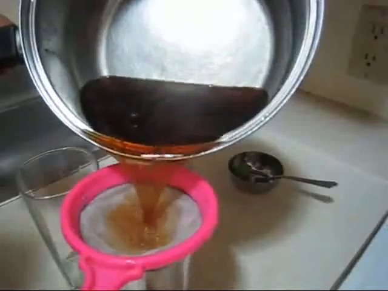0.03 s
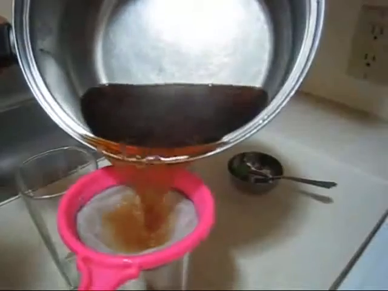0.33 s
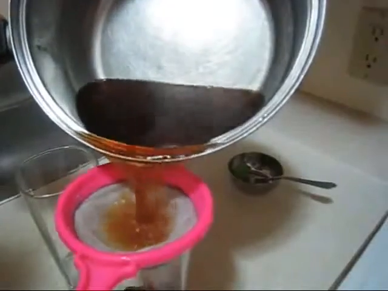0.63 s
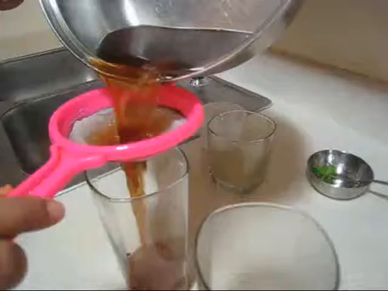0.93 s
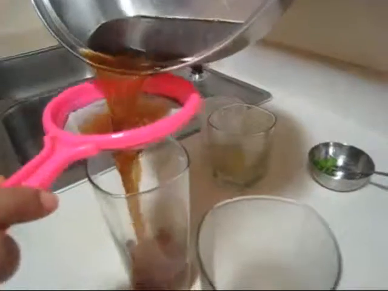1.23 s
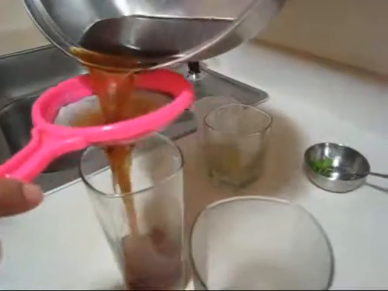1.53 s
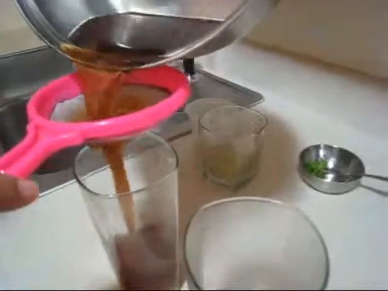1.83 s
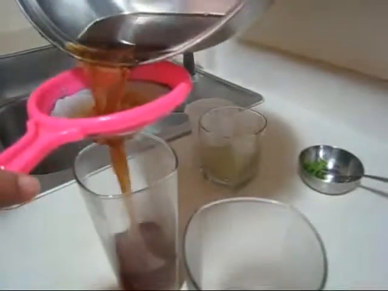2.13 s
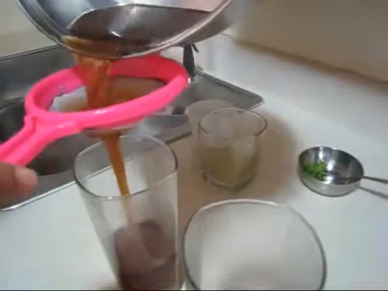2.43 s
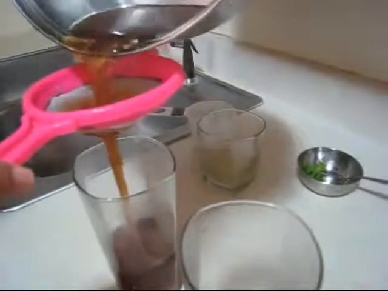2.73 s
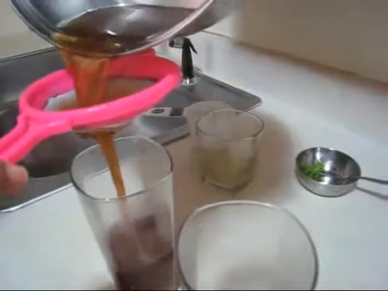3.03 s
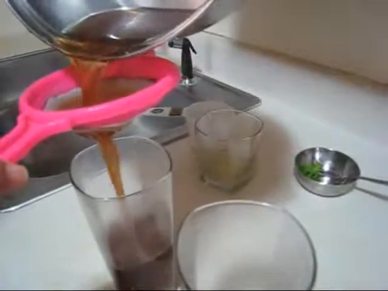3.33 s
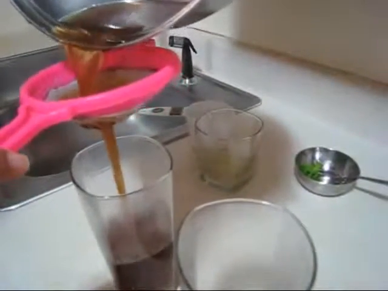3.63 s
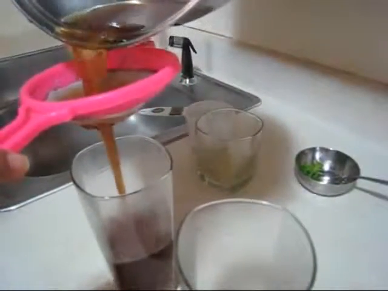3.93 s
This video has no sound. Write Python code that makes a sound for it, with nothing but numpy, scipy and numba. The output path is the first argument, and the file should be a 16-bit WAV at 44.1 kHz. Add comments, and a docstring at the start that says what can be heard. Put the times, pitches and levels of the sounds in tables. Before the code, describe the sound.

Tea trickles through a strainer into a glass close by, over a steady low kitchen appliance hum. The pan gives a sharp tap at about 0.8 seconds, and the sound briefly drops out. From 1 second the pour returns with more gurgling and fizz, with a soft bump near 1.2 and a strainer clink at 1.5. Pattering and small plinks continue until 4 seconds, the pitch gradually rising.

```python
"""Tea patters from a pan through a strainer into a tall glass, over the hum of a kitchen appliance.
The impacts of the stream excite the air column in the glass, whose resonance rises as it fills.
Trapped bubbles oscillate as gulps, plinks and fizz; the utensils clink, knock and bump.
The sound drops out briefly near one second, and images of its spectrum brighten the treble."""
import sys
import numpy as np
from scipy import signal
from scipy.fft import rfft, irfft
from scipy.io import wavfile
from scipy.ndimage import uniform_filter1d
from numba import njit

SR = 44100
rng = np.random.default_rng(int(sys.argv[2]) if len(sys.argv) > 2 else 0)


def inscribe(sig):
    """Save sig as 16-bit PCM at rate SR to the path in sys.argv[1].

    A 1-D sig is mono; a 2-D sig holds one channel per row.
    Samples are clipped to [-1, 1] before scaling.
    """
    pcm = np.round(np.clip(np.atleast_2d(sig).T, -1, 1) * 32767)
    wavfile.write(sys.argv[1], SR, pcm.astype(np.int16))


N = 176400
T = np.arange(N) / SR

# partials of the appliance motor (f/Hz, rms level/dB)
HUM_PARTIALS = [(59, -47), (90, -58), (212, -51.5), (231, -39.5), (303, -52.5), (353, -51), (462, -53.5)]
# room noise spectrum (f/Hz, relative level/dB)
ROOM_SPECTRUM = [(10, -37), (22, 2), (40, -11), (58, -5.5), (100, 4), (135, -7.5), (215, 4), (270, -8),
                 (400, -10.5), (700, -17), (1200, -19), (2500, -26.5), (5500, -32.5)]
# course of the pour (t/s, air column f/Hz, air column level/dB, patter level/dB)
POUR_COURSE = [(0, 649, -44, -47.5), (.36, 654, -46, -47), (.45, 694, -53, -54.5), (.9, 710, -61, -52),
               (1.05, 664, -38.5, -42.5), (1.4, 686, -40.5, -46), (1.58, 739, -46.5, -47),
               (1.8, 764, -44, -43), (2.1, 766, -37, -45.5), (2.35, 797, -46, -43), (2.5, 817, -37.5, -50),
               (2.6, 782, -47, -48), (3.1, 782, -48, -50), (3.55, 828, -51, -46), (3.75, 936, -39, -48),
               (3.84, 920, -53.5, -50.5), (3.92, 915, -40.5, -44), (4, 902, -44, -48.5)]
# spectrum of the stream's impacts (f/Hz, relative level/dB)
PATTER_SPECTRUM = [(200, -28.5), (450, 2), (900, 5), (1300, -2.5), (2000, -2.5), (3200, -11), (4200, -17),
                   (5500, -11)]
# upper mode of the air column (t/s, f/Hz, level/dB)
AIR_OVERTONE = [(0, 1827, -45.5), (.139, 1945, -48), (.22, 1950, -62), (.35, 1980, -45), (.45, 2040, -66),
                (.7, 2045, -61), (.92, 2080, -68), (1.05, 1776, -48), (1.4, 1780, -55), (1.7, 2020, -57),
                (4, 2150, -90)]
# response of the glass and the counter (f/Hz, gain/dB)
COUNTER_RESPONSE = [(300, 0), (560, -1.5), (612, 3), (652, -3), (690, 1.5), (790, 0), (818, -3), (850, -8),
                    (915, 2), (1000, 0), (1150, 1), (2050, .5), (2350, -3), (2800, 0), (5500, 1)]
# envelope of the froth (t/s, level/dB)
FROTH_LEVEL = [(0, -53), (.12, -63.5), (.2, -79), (.3, -48.5), (.42, -62), (.9, -76.5), (1.05, -45.5),
               (1.35, -44.5), (1.45, -49), (1.65, -50.5), (1.8, -52), (2.3, -56), (2.55, -54.5),
               (3.2, -52.5), (3.5, -60), (4, -53)]
# faint high ringing of the strainer as the tea trickles through it (f/Hz, bandwidth/Hz, level/dB)
STRAINER_RING = [(3140, 70, -71), (3650, 80, -62.5)]
# envelope of the fine spray (t/s, level/dB)
SPRAY_LEVEL = [(0, -61), (1, -68), (1.1, -61), (2.3, -63), (2.7, -59), (3.5, -56), (4, -55.5)]
# small bubbles near the surface (t/s, level/dB, f/Hz)
SMALL_BUBBLES = [(.1026, -26, 3430), (.134, -31, 1980), (0.286, -26, 3580), (.338, -27, 3530),
                 (.699, -28.5, 2070), (1.157, -28, 3260), (1.191, -26, 2870), (1.317, -28, 3305),
                 (1.3317, -24, 3010), (1.3387, -24, 3070), (1.37, -23.5, 2880), (1.383, -23.5, 3160),
                 (1.412, -30, 3360), (1.519, -22, 3260), (1.6295, -23.5, 3100), (2.0315, -26, 3390),
                 (2.299, -23.5, 2530), (2.4255, -21.5, 2880), (2.6734, -24.5, 3660), (2.706, -29.5, 2560),
                 (2.834, -30, 2560), (2.882, -22.5, 2160), (3.105, -27, 3400), (3.189, -28, 4300),
                 (3.282, -26.5, 3900), (3.312, -28, 2570), (3.408, -24.5, 4420), (3.4355, -23.5, 3370),
                 (3.5114, -23.5, 3370), (3.54, -24.5, 4500), (3.599, -26, 2720), (3.6715, -26.5, 3230),
                 (3.833, -30, 2700), (3.862, -28.5, 3540), (3.8918, -23, 3000), (3.9593, -24, 2830)]
# large bubbles (t/s, level/dB, f/Hz, decay time/s)
LARGE_BUBBLES = [(.1205, -22, 864, 0.00273), (.548, -33, 950, 0.0043), (1.051, -21.5, 629, 0.015),
                 (1.068, -16, 710, 0.0046), (1.071, -25.5, 1000, 0.003), (1.089, -22.5, 764, 0.0079),
                 (1.137, -26.5, 678, 0.009), (1.2, -29, 747, 0.0053), (1.28, -22.5, 745, 0.0038),
                 (1.312, -26.5, 690, 0.0081), (1.368, -24, 764, 0.0051), (1.558, -28.5, 905, 0.0058),
                 (1.642, -29.5, 777, 0.0068), (1.769, -29.5, 780, 0.011), (1.823, -20.5, 806, 0.0048),
                 (1.851, -27.5, 775, 0.0044), (1.973, -33.5, 767, 0.0099), (2.03, -29.5, 780, .009),
                 (2.05, -26.5, 753, 0.011), (2.116, -30, 797, 0.014), (2.222, -28, 753, 0.0095),
                 (2.248, -29, 800, .011), (2.274, -26.5, 787, 0.0069), (2.3, -24, 804, 0.0096),
                 (2.447, -26, 782, 0.0084), (2.517, -29.5, 803, 0.013), (2.647, -24.5, 790, 0.01),
                 (2.769, -25, 805, 0.0074), (2.881, -31.5, 780, 0.0069), (3.07, -23, 810, .006),
                 (3.171, -28.5, 900, 0.0037), (3.573, -32.5, 1230, .0038), (3.672, -19, 940, 0.0068),
                 (3.723, -25.5, 915, .0055), (3.772, -35, 925, 0.0075), (3.8727, -18, 880, 0.0048),
                 (3.911, -27.5, 1280, 0.0033), (3.92, -28.5, 896, 0.0085), (3.948, -32, 923, 0.0075)]
# spectrum of a large bubble's splash (f/Hz, relative level/dB)
SPLASH_SPECTRUM = [(300, -20.5), (600, 0.5), (1000, 6), (1700, -3.5), (5500, -16)]
# blows on the pan (t/s, level/dB)
PAN_BLOWS = [(.8195, -22.5), (.8342, -1.5)]
# modes of the pan (f/Hz, relative level/dB, decay time/s)
PAN_MODES = [(3694, -2.5, 0.0011), (3170, -15.5, 0.0011), (1107, -11.5, 0.0005), (1790, -19.5, 0.0014)]
# handling bumps (t/s, level/dB, f/Hz, decay time/s, tick level/dB)
HANDLING_BUMPS = [(1.244, -7.5, 91, 0.0031, -29), (1.303, -16, 108, 0.0044, -41)]
# blows of the strainer on the glass (t/s, level/dB)
STRAINER_BLOWS = [(1.499, -23), (1.5027, -7.5), (1.5045, -6.5), (1.5062, -16)]
# modes of the strainer on the glass (f/Hz, relative level/dB, decay time/s)
STRAINER_MODES = [(960, -8.5, 0.0026), (1480, -6, .0034), (2000, -6, 0.0025), (3120, -9, 0.0024),
                  (3550, -2, 0.00093), (4900, -18, 0.0012)]

ROOM_DB, HUM_WANDER, HUM_FLICKER_DB = -36, 0.00572, 2.5
PATTER_PER_S, PATTER_SPREAD_DB, SURGE_DB = 1500, 3, 2.5
AIR_WIDTH_HZ, OVERTONE_WIDTH_HZ = 49., 160.
FIZZ_PER_S, FIZZ_SPREAD_DB, FIZZ_CYCLES, FIZZ_LOW_HZ, FIZZ_HIGH_HZ = 700, 4, 5.6, 1954, 4730
SPRAY_PER_S, SPRAY_SPREAD_DB, SPRAY_HZ, SPRAY_WIDTH_HZ = 130, 2.6, 4580., 1800.
PLINK_CYCLES, SMALL_RISE_PER_S, PLINK_TICK_DB = 4.2, 6, -14
REFLECTION_S, REFLECTION_DB, GULP_AIR_DB, SPLASH_S, SPLASH_DB = 0.005157, -8, -10, 0.0073, -11.5
TAIL_S, TAIL_DB, TAIL_ABOVE_HZ = 0.015, -6.5, 1500
PAUSE_START_S, PAUSE_END_S, PAUSE_DB, HOLD_SAMPLES = .919, 1.049, -65, 4


def amp(db):
    """Amplitude ratio of a level in decibels."""
    return 10 ** (np.asarray(db) / 20)


def unit(x):
    """Normalisation to rms 1."""
    return x / np.sqrt(np.mean(x ** 2))


def curves(table):
    """Linear interpolation in time of each column after the first."""
    times, *columns = np.array(table).T
    return [np.interp(T, times, column) for column in columns]


def walk(rate):
    """Smoothed random fluctuation with a spread near 1."""
    span = int(SR / rate)
    steps = np.repeat(rng.standard_normal(N // span + 1), span)
    return 1.414 * uniform_filter1d(uniform_filter1d(steps, span), span)[:N]


def colour(x, points):
    """Minimum-phase filter through (f/Hz, gain/dB) points, cut off at half the hold rate."""
    hz, db = np.array(points).T
    f = np.maximum(np.arange(N // 2 + 1) * SR / N, 1)
    gain = amp(np.interp(np.log(f), np.log(hz), db))
    cepstrum = irfft(np.log(gain), N)
    cepstrum[1:N // 2] *= 2
    cepstrum[N // 2 + 1:] = 0
    return irfft(rfft(x) * np.exp(rfft(cepstrum)) * (f < SR / HOLD_SAMPLES / 2), N)


@njit
def resonate(x, hz, width):
    """Second-order resonator with unit gain at its moving centre frequency."""
    y, band, low = np.empty(len(x)), 0., 0.
    for i in range(len(x)):
        g, loss = np.tan(np.pi * hz[i] / SR), width / hz[i]
        v = (band + g * (x[i] - low)) / (1 + g * (g + loss))
        band, low, y[i] = 2 * v - band, low + 2 * g * v, loss * v
    return y


def ping(hz, decay, rise=0, attack=.0001):
    """Damped oscillation whose frequency grows by the fraction `rise` per second."""
    t = T[:int(6 * decay * SR) + 2]
    return np.sin(2 * np.pi * hz * (t + rise * t * t / 2)) * np.exp(-t / decay) * (1 - np.exp(-t / attack))


def burst(decay, length=SR // 4):
    """White noise under exponential decay."""
    return rng.standard_normal(length) * np.exp(-T[:length] / decay)


def add(out, start, sound):
    """Superposition of a sound from time `start` on."""
    i = int(np.clip(start * SR, 0, N - 1))
    out[i:i + len(sound)] += sound[:N - i]


def kitchen():
    """Motor partials under slow random modulation of frequency and amplitude, over room noise."""
    out = amp(ROOM_DB) * unit(colour(rng.standard_normal(N), ROOM_SPECTRUM))
    for hz, db in HUM_PARTIALS:
        turns = np.cumsum(hz * (1 + HUM_WANDER * walk(12))) / SR + rng.random()
        out += np.sqrt(2) * amp(db + HUM_FLICKER_DB * walk(14)) * np.sin(2 * np.pi * turns)
    return out


def stream():
    """Shot noise of dense tiny impacts, heard directly and through two modes of the air column."""
    _, air_db, patter_db = curves(POUR_COURSE)
    sizes = amp(PATTER_SPREAD_DB * np.minimum(rng.exponential(size=N), 5)) * rng.choice([-1, 1], N)
    hits = sizes * (rng.random(N) < PATTER_PER_S / SR) * amp(SURGE_DB * walk(80))
    patter = unit(colour(hits, PATTER_SPECTRUM))
    ring = unit(glass_air(patter)) * amp(air_db)
    overtone_hz, overtone_db = curves(AIR_OVERTONE)
    overtone = resonate(patter, overtone_hz, OVERTONE_WIDTH_HZ)
    overtone = unit(resonate(overtone, overtone_hz, OVERTONE_WIDTH_HZ)) * amp(overtone_db)
    return patter * amp(patter_db) + ring + overtone


def glass_air(x):
    """Air column resonance: the frequency rises as the tea shortens the column."""
    air_hz, _, _ = curves(POUR_COURSE)
    return resonate(x, air_hz, AIR_WIDTH_HZ)


def fizz():
    """Free oscillations of many tiny bubbles, mostly of middling size, sum to a crackling froth."""
    out = np.zeros(N)
    for when, a, b, size, sustain in rng.random((int(FIZZ_PER_S * N / SR), 5)):
        hz = FIZZ_LOW_HZ * (FIZZ_HIGH_HZ / FIZZ_LOW_HZ) ** ((a + b) / 2)
        gain = amp(-FIZZ_SPREAD_DB * np.log(size + 0.013))
        decay = FIZZ_CYCLES * (.5 + sustain) / hz
        add(out, when * N / SR, gain * ping(hz, decay, SMALL_RISE_PER_S))
    return unit(out) * amp(curves(FROTH_LEVEL)[0])


def trickle():
    """Forced vibration: until the pause, tea trickling through the strainer makes it ring faintly."""
    out = np.zeros(N)
    for hz, width, db in STRAINER_RING:
        out += amp(db) * unit(resonate(rng.standard_normal(N), np.full(N, float(hz)), float(width)))
    return out * (T < PAUSE_START_S)


def spray():
    """Sparse droplets strike the glass; each tick is the impulse response of a broad resonance."""
    sizes = amp(SPRAY_SPREAD_DB * np.minimum(rng.exponential(size=N), 4))
    hits = sizes * (rng.random(N) < SPRAY_PER_S / SR)
    ticks = colour(resonate(hits, np.full(N, SPRAY_HZ), SPRAY_WIDTH_HZ), COUNTER_RESPONSE)
    return unit(ticks) * amp(curves(SPRAY_LEVEL)[0])


def plinks():
    """Bubble resonance: small pockets of air near the surface start with a tick and ring high."""
    out = np.zeros(N)
    for start, db, hz in SMALL_BUBBLES:
        add(out, start, amp(db) * ping(hz, PLINK_CYCLES / hz, SMALL_RISE_PER_S, attack=0.0005))
        add(out, start, amp(db + PLINK_TICK_DB) * burst(decay=.003))
    return out


def gulps():
    """Large bubbles resonate low and reflect off the pan; with their splash they drive the air column."""
    tones, splash_envelope = np.zeros(N), np.zeros(N)
    for start, db, hz, decay in LARGE_BUBBLES:
        gulp = amp(db) * ping(hz, decay, rise=1, attack=.0003)
        add(tones, start, gulp)
        add(tones, start + REFLECTION_S, amp(REFLECTION_DB) * gulp)
        add(splash_envelope, start, amp(db + SPLASH_DB) * np.exp(-T[:SR // 10] / SPLASH_S))
    splash = splash_envelope * unit(colour(rng.standard_normal(N), SPLASH_SPECTRUM))
    return tones + splash + glass_air(splash + amp(GULP_AIR_DB) * tones)


def clinks(blows, modes):
    """Modal vibration: each blow excites the heavily damped modes of a hand-held utensil."""
    out = np.zeros(N)
    for start, db in blows:
        for hz, mode_db, decay in modes:
            add(out, start, amp(db + mode_db) * ping(hz, decay, attack=0.00022))
    return out


def bumps():
    """Impulsive excitation: handling gives one low, heavily damped oscillation and a tick of noise."""
    out = np.zeros(N)
    for start, db, hz, decay, tick_db in HANDLING_BUMPS:
        add(out, start, -amp(db) * ping(hz, decay))
        add(out, start, amp(tick_db) * burst(decay=0.0037, length=SR // 20))
    return out


def scene():
    """Superposition of all sources; the pour's treble scatters briefly off the counter and wall."""
    tea = colour(stream() + fizz() + plinks() + gulps(), COUNTER_RESPONSE) + trickle() + spray()
    highpass = signal.butter(4, TAIL_ABOVE_HZ, "high", fs=SR, output="sos")
    echo = signal.sosfilt(highpass, burst(TAIL_S))
    scattered = amp(TAIL_DB) * signal.fftconvolve(tea, echo / np.linalg.norm(echo))[:N]
    utensils = clinks(PAN_BLOWS, PAN_MODES) + bumps() + clinks(STRAINER_BLOWS, STRAINER_MODES)
    return (kitchen() + tea + scattered + utensils)[None]


def record(dry):
    """The sound drops out once; sample-and-hold imaging mirrors its spectrum into the treble."""
    paused = (T > PAUSE_START_S) & (T < PAUSE_END_S)
    gated = dry * np.where(paused, amp(PAUSE_DB), 1)
    held = np.repeat(gated[:, ::HOLD_SAMPLES], HOLD_SAMPLES, axis=1)[:, :N]
    lowpass = signal.ellip(10, .2, 80, 15500, fs=SR, output="sos")
    return signal.sosfilt(lowpass, held)


dry = scene()
out = record(dry)
inscribe(out)
```